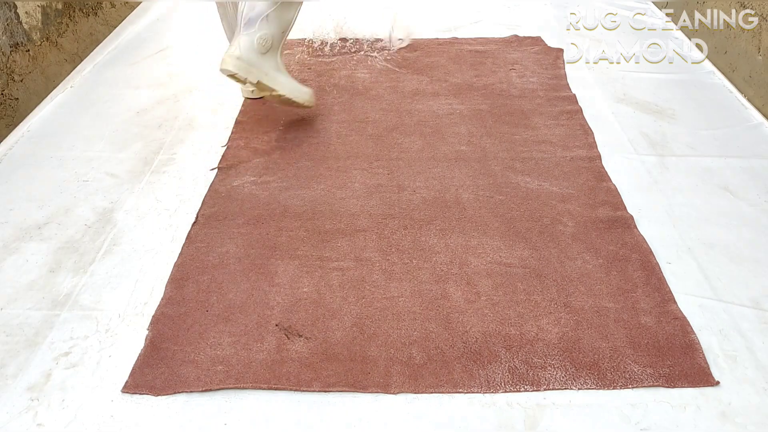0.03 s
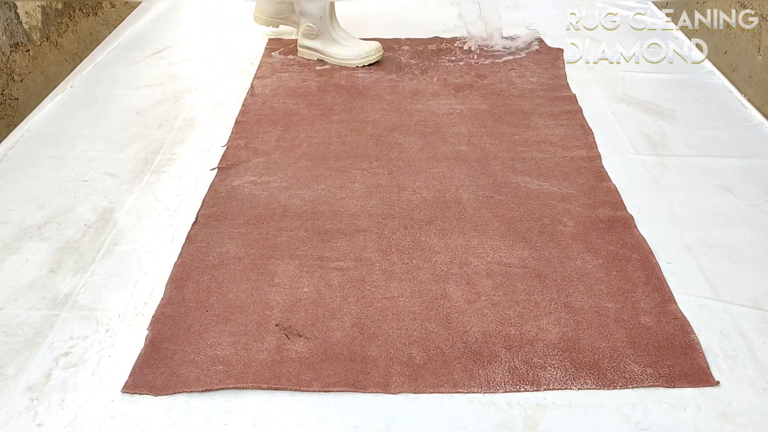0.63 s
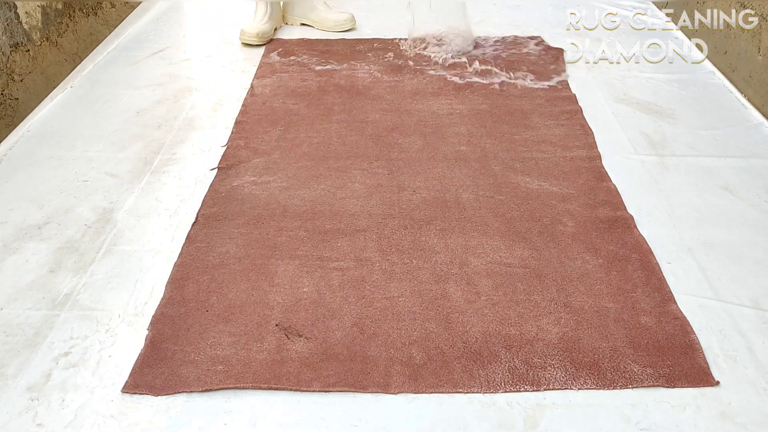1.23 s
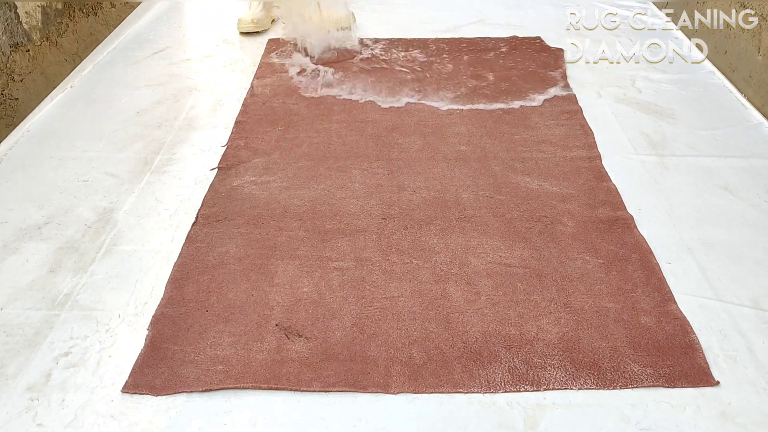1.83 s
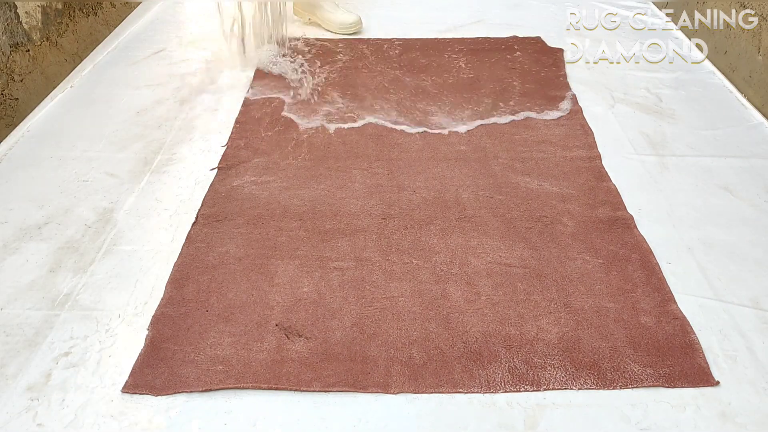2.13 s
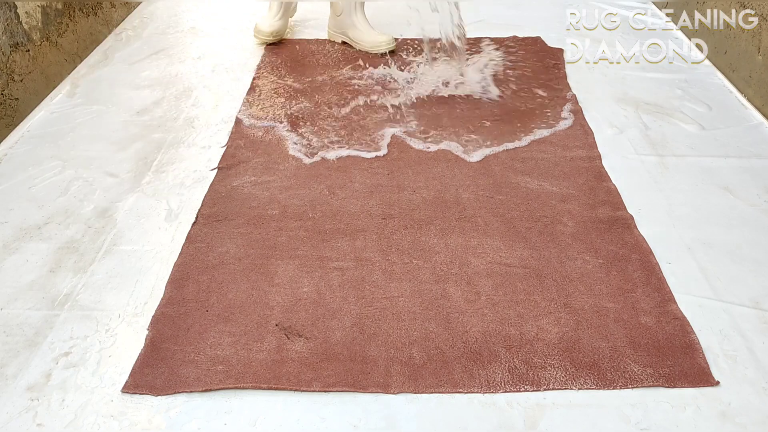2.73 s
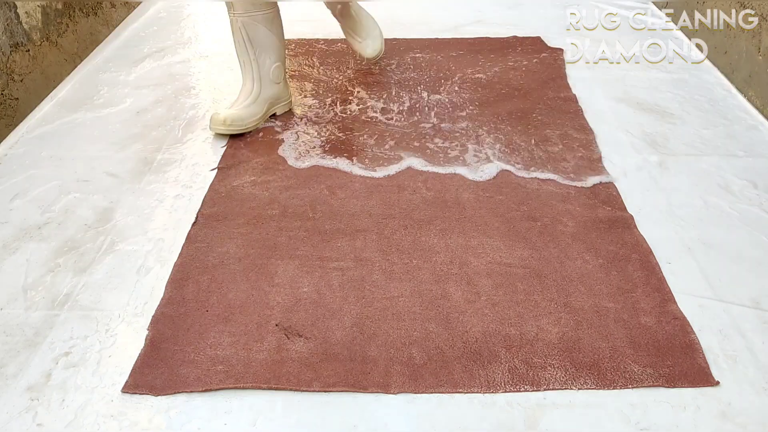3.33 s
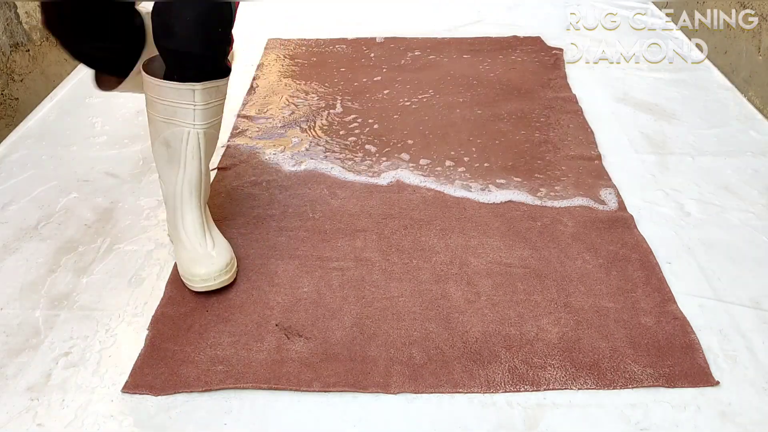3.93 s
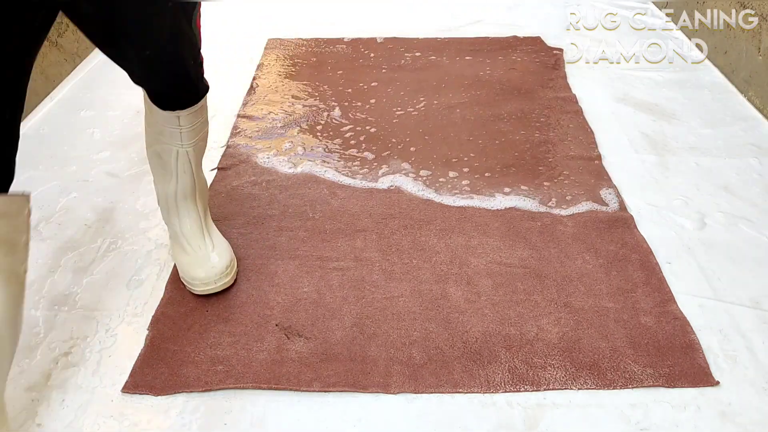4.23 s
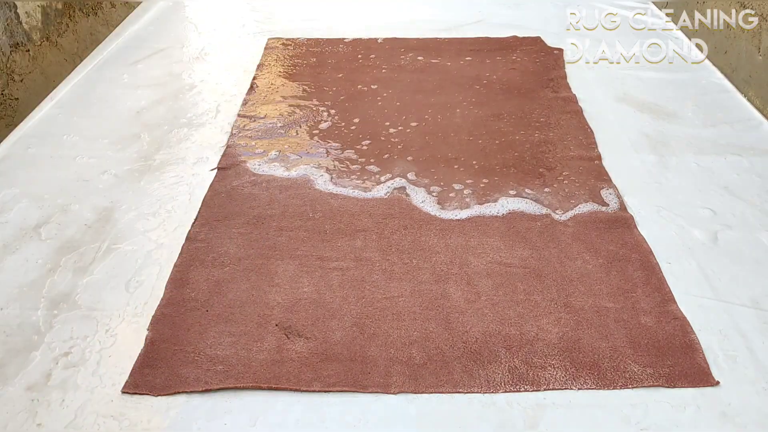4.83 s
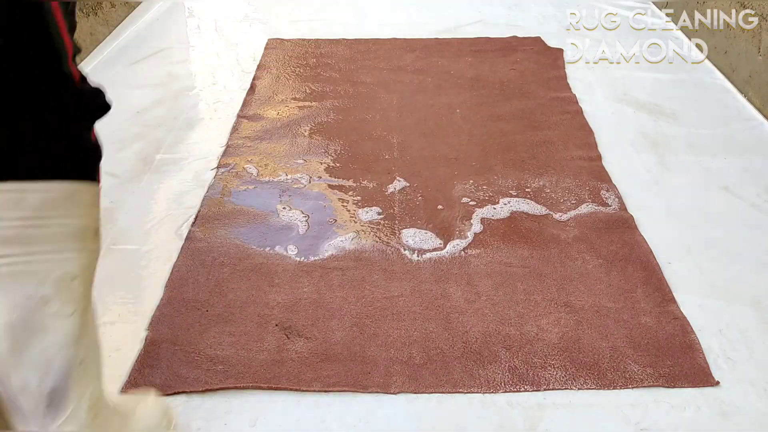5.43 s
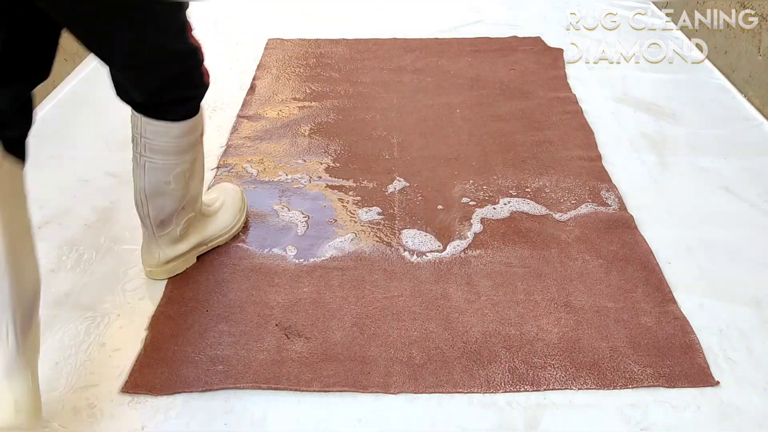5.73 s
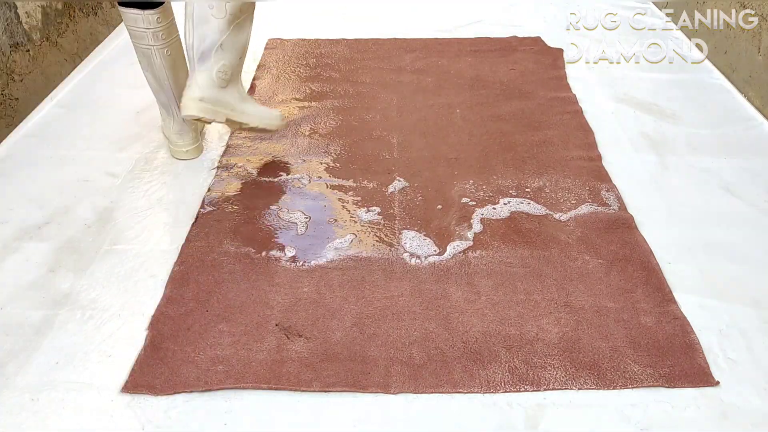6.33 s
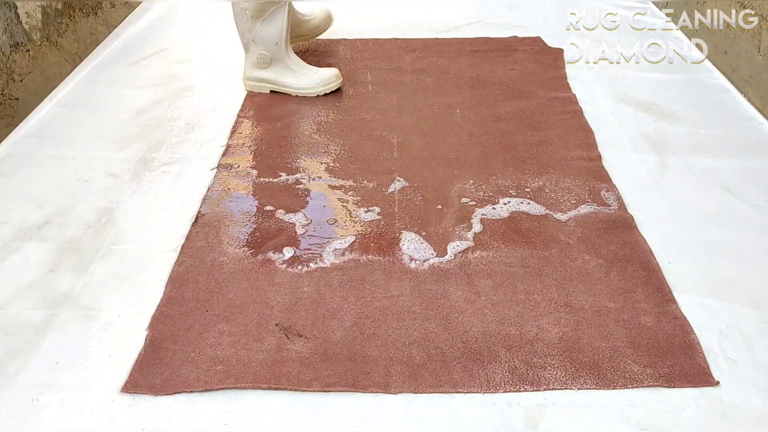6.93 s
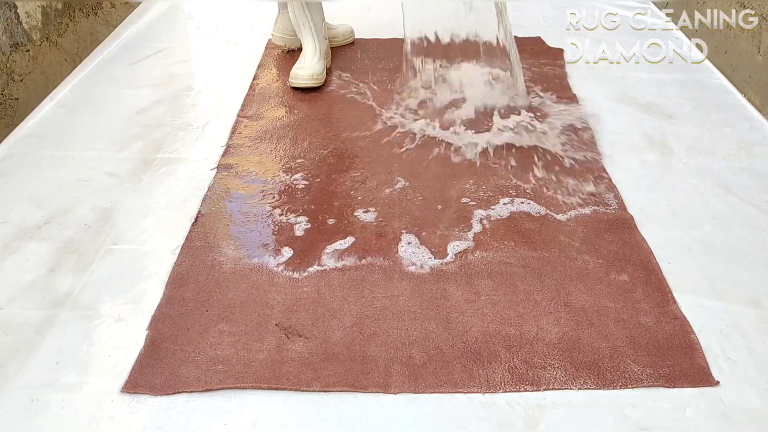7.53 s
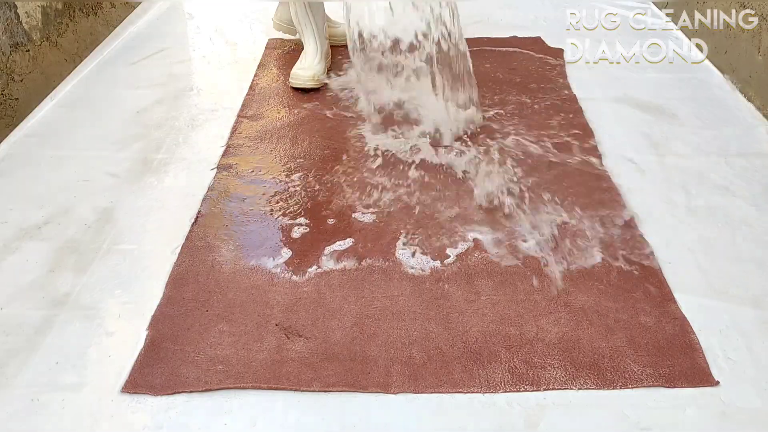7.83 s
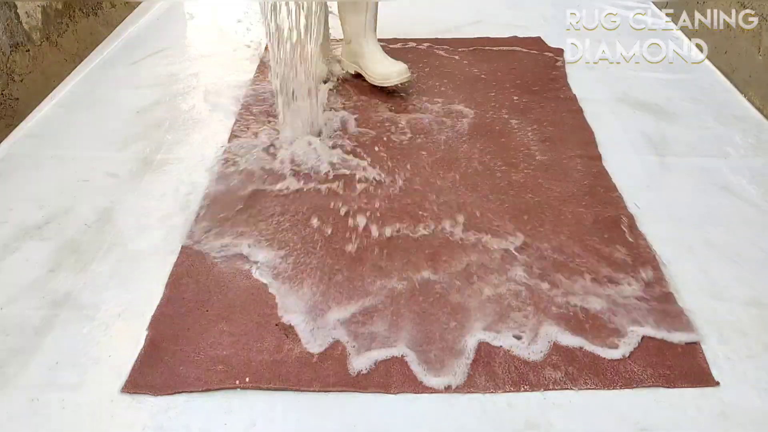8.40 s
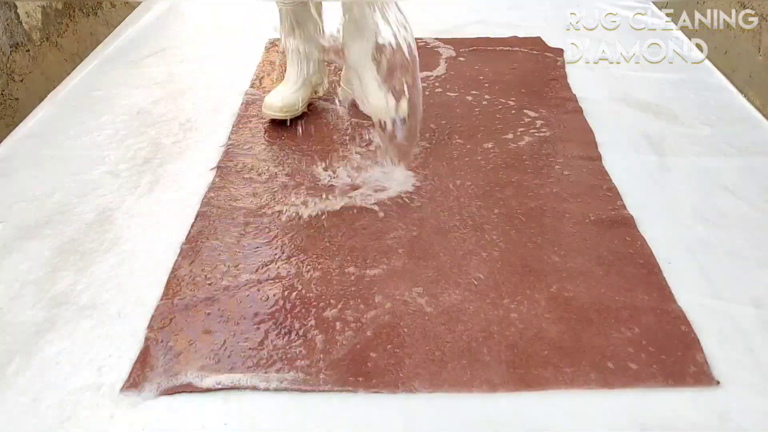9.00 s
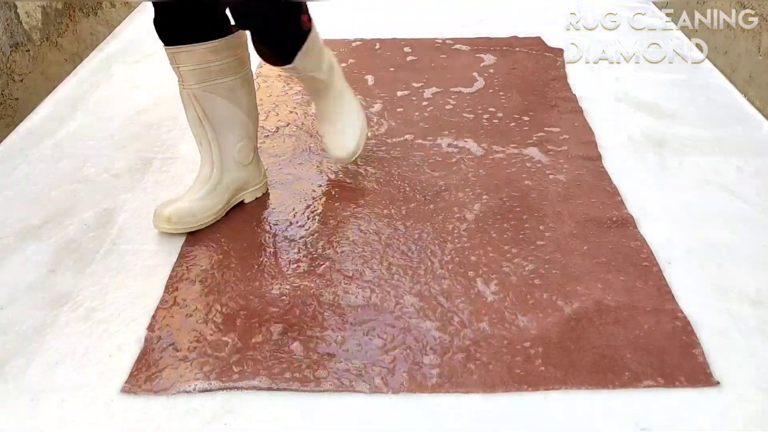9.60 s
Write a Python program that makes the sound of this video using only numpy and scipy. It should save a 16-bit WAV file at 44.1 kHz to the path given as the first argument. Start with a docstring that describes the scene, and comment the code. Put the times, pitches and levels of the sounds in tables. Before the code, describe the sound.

Two loud pours of water splash onto a rug on a hard floor, separated by rubber boots thudding and squelching.

```python
"""A machine hums far from a bare washroom as a bucket of water is sluiced over a rug on the hard floor.
Drops spatter, and the stream plunges into its own puddle, trapping bubbles of air that ring.
After three seconds the pour ends; foam fizzes while rubber boots thud and squelch on the soaked rug.
Near seven seconds a second bucket follows, and a low, wavering note rings in the room under it.
Just after nine seconds the water stops, leaving the foam and a few last steps."""
import sys
import numpy as np
from scipy import signal
from scipy.fft import rfft, irfft, next_fast_len
from scipy.io import wavfile
from scipy.ndimage import uniform_filter1d

SR = 44100
rng = np.random.default_rng(int(sys.argv[2]) if len(sys.argv) > 2 else 0)


def generate_wav(sig):
    """Save sig (samples, or channels by samples) to the path in sys.argv[1] as 16-bit PCM at SR."""
    pcm = np.round(np.clip(np.atleast_2d(sig).T, -1, 1) * 32767).astype(np.int16)
    wavfile.write(sys.argv[1], SR, pcm)


N = 426006
TIME = np.arange(N) / SR


def amp(db):
    """Turns decibels into a number to multiply a sound by."""
    return 10 ** (np.asarray(db) / 20)


def evened(x):
    """Scales a sound to a standard strength (rms 1)."""
    return x / np.sqrt(np.mean(x ** 2) + 1e-20)


def read(points, hz):
    """Looks up a table by pitch, blending between rows on a musical (log) scale."""
    f, value = np.transpose(points)
    return np.interp(np.log(hz + 1), np.log(f + 1), value)


def add(mix, start_s, sound):
    """Mixes a sound in at the given time."""
    part = mix[:, max(round(start_s * SR), 0):][:, :sound.shape[1]]
    part += sound[:, :part.shape[1]]


def tint(x, db_at):
    """Turns each pitch up or down by the decibels that db_at gives for it."""
    size = next_fast_len(x.shape[-1] + 2048, True)
    gain = amp(db_at(np.fft.rfftfreq(size, 1 / SR)))
    return irfft(rfft(x, size) * gain, size)[..., :x.shape[-1]]


def humps(notes, hz):
    """The boost in decibels around a few ringing notes."""
    return sum(db / (1 + (2 * (hz - f) / width) ** 2) for f, width, db in notes)


def drift(size, per_s):
    """A random wobble that heads for a new value per_s times a second."""
    at = np.arange(size) * per_s / SR
    return evened(np.interp(at, np.arange(8192), rng.standard_normal(8192)))


def swell(rise_s, decay_s, size):
    """The loudness of one hit: it builds up, then dies away."""
    return (1 - np.exp(-TIME[:size] / max(rise_s, 1e-4))) * np.exp(-TIME[:size] / max(decay_s, 1e-3))


def diffuse(pair, db_at, spacing_m=0.2):
    """Sound from all sides: left and right agree only on waves longer than the gap between them."""
    size = next_fast_len(pair.shape[1], True)
    hz = np.fft.rfftfreq(size, 1 / SR)
    a, b = rfft(pair, size) * amp(db_at(hz))
    same = np.sinc(2 * hz * spacing_m / 343)  # sound travels 343 m a second
    mid, side = a * np.sqrt((1 + same) / 2), b * np.sqrt((1 - same) / 2)
    return evened(irfft([mid + side, mid - side], size)[:, :pair.shape[1]])


# Notes that build up between the walls: pitch_hz, width_hz, boost_db
ROOM_NOTES = [(183.2, 6.6, 10), (283.4, 8.4, 4.5), (352, 16, 6.5), (404, 22, 5), (414, 17, 3),
              (484, 14, 3.5), (715, 29, 3)]
# How long an echo takes to fade by 60 dB: pitch_hz, fade_s
ECHO_FADE = [(150, 0.59), (400, 0.36), (1000, 0.27), (2800, 0.4), (7300, 0.21), (15000, 0.2)]
def room(x, direct=0.39, size=16384):
    """Sound from one spot arrives straight through the air, then as a blur of echoes off the walls."""
    noise = diffuse(rng.choice([-1., 1.], (2, size)), np.zeros_like)
    hz, t, bands = signal.stft(noise, SR, nperseg=256)
    tail = signal.istft(bands * amp(-60 * t / read(ECHO_FADE, hz)[:, None]), SR)[1]
    path = tail / np.linalg.norm(tail[0])
    path[[0, 1], rng.integers(0, 16, 2)] += direct
    for f, width, db in ROOM_NOTES:
        path = path + (amp(db) - 1) * signal.lfilter(*signal.iirpeak(f, f / width, SR), path)
    return signal.oaconvolve(np.atleast_2d(x), path / np.hypot(1, direct), axes=1)[:, :N]


# The tone of the quiet room: pitch_hz, level_db
RUMBLE_TONE = [(20, 0.5), (35, -7), (60, -10.5), (100, 1), (140, -17.5), (190, -5.5), (260, -11),
               (420, -12), (650, -16), (1200, -22.5), (3000, -26.5), (7000, -28), (15000, -26.5)]
# The tone of moving air: pitch_hz, level_db
DRAUGHT_TONE = [(15, -17), (35, -5), (55, 9), (200, -18), (2000, -70)]
def still_room(hum_hz=48.6, waver=0.54):
    """A low rumble, a faint draught and the wavering hum of a distant machine."""
    noise = rng.standard_normal((2, N))
    rumble = diffuse(noise, lambda hz: read(RUMBLE_TONE, hz) + humps(ROOM_NOTES, hz) / 2)
    draught = evened(tint(rng.standard_normal((2, N)), lambda hz: read(DRAUGHT_TONE, hz)))
    note = np.sin(2 * np.pi * hum_hz * TIME + waver * drift(N, per_s=22))
    hum = evened(note * (1 + waver * drift(N, per_s=6.8)))
    return amp(-50) * rumble + amp(-59) * draught + amp(-53) * hum


def impacts(shape, per_s, spread_db):
    """Drops land at random, one click each; spread_db sets how much their sizes differ."""
    clicks = np.zeros(shape)
    where, sign, chance = rng.random((int(clicks.size * per_s / SR), 3)).T
    size_db = spread_db * np.minimum(-np.log(1 - chance), 4)
    clicks.flat[(where * clicks.size).astype(int)] = np.sign(sign - .5) * amp(size_db)
    return clicks


def drops(size, tone, per_s=7000, spread_db=6.5):
    """Drops of one kind land close by."""
    return evened(tint(impacts(size, per_s, spread_db), lambda hz: read(tone, hz)))


def shower(tone, per_s, spread_db):
    """Drops of one kind land all around, heard mostly by way of the walls."""
    return diffuse(impacts((2, N), per_s, spread_db), lambda hz: read(tone, hz))


def splats(per_s=40, decay_s=.005, depth=.35):
    """The spray gets louder for an instant each time a fold of the stream hits the floor."""
    hits = abs(impacts(N, per_s, spread_db=0))
    leaps = signal.oaconvolve(hits, np.exp(-TIME[:4096] / decay_s))[:N]
    return evened(1 + depth * leaps)


def patchy(x, depth_db):
    """The spatter's tone flickers at random from moment to moment."""
    bands = signal.stft(x, nperseg=512, noverlap=256)[2]
    patches = uniform_filter1d(rng.standard_normal(bands.shape[1:]), size=3, axis=0)  # blur in pitch
    patches = uniform_filter1d(patches, size=7, axis=1)  # blur in time
    return evened(signal.istft(bands * amp(depth_db * evened(patches)))[1][:, :N])


def bubbles(low_hz, high_hz, per_s, cycles, glide=0.081, count=24):
    """Trapped air rings briefly, rising in pitch as it nears the surface."""
    out = np.zeros(N)
    for hz in np.geomspace(low_hz, high_hz, count):
        age = np.arange(0, 4, hz / cycles / SR)  # counted in decay times
        births = rng.integers(0, N - len(age), int(per_s * N / SR / count))
        detune, size = rng.standard_normal((len(births), 2)).T[:, :, None]
        ring = np.exp(-age) * np.sin(2 * np.pi * cycles * age * (1 + 0.031 * detune + glide * age / 2))
        places = births[:, None] + np.arange(len(age))
        out += np.bincount(places.ravel(), (size * ring).ravel() * np.sqrt(hz), N)
    return evened(out)


def cavity(stir, hz, width_hz):
    """A pocket of air in water rings when stirred, at a pitch that may move."""
    turn = np.exp(2j * np.pi * np.cumsum(hz * np.ones(stir.shape[-1])) / SR)
    hold = np.exp(-np.pi * width_hz / SR)
    # shift the pitch down to zero, smooth twice, then shift it back
    smoothed = signal.lfilter([1], [1, -2 * hold, hold * hold], stir * turn.conj())
    return evened((turn * smoothed).real)


# The tone of tiny drops: pitch_hz, level_db
FINE_TONE = [(500, -53), (3000, -24), (6000, -9), (8000, -0.5), (11000, 4), (13000, -0.5), (15500, -18.5)]
# The tone of mid-sized drops: pitch_hz, level_db
SPATTER_TONE = [(900, -20), (2000, -17), (3000, -1), (5500, -0.5), (7500, -1.5), (11000, -5.5)]
# The tone of large flung drops: pitch_hz, level_db
SQUIRT_TONE = [(300, -9.5), (1500, -2.5), (3000, -0.5), (4200, 4), (6500, 0.5), (8000, 1), (11000, -0.5)]
# The tone of coarse splashing: pitch_hz, level_db
SPLASH_TONE = [(300, -46), (700, -11), (1100, 1), (2200, 7.5), (3000, 8), (6000, -45)]
# The tone of the plunge, whose cavity is too small for bass: pitch_hz, level_db
PLUNGE_TONE = [(100, -21), (215, -18), (275, -2), (400, -5.5), (1000, 7.5)]
# The tone of water drumming on the floor: pitch_hz, level_db
DRUM_TONE = [(90, -6), (150, -8), (179, 11.5), (230, -3), (330, -16), (1500, -68)]
# One list a bucket, with plunge and splash relative to the flow:
# time_s, flow_db, plunge_db, splash_db, plunge_pitch_hz
BUCKETS = [
    [(0, -24, -19.5, -16, 437), (.1, -24, -17.5, -19, 470), (.22, -22.5, -17, -19.5, 524),
     (.29, -23, -18, -19, 586), (.37, -25.5, -24, -14, 640), (.43, -28, -27, -14.5, 700),
     (.46, -25, -26.5, -16.5, 610), (.6, -28, -17.5, -21, 475), (.65, -25.5, -18, -15.5, 470),
     (.72, -26.5, -22.5, -15, 540), (.85, -26.5, -17, -16.5, 590), (1.14, -24, -22, -16.5, 500),
     (1.36, -27.5, -17, -13.5, 450), (1.43, -26.5, -16, -13, 440), (1.66, -30, -18, -15, 503),
     (1.72, -26.5, -21, -15.5, 540), (2.0, -27, -18.5, -13.5, 560), (2.14, -27.5, -24.5, -16.5, 590),
     (2.32, -25, -46, -18, 620), (2.38, -23, -25, -18, 570), (2.61, -29.5, -23, -15, 580),
     (2.78, -28, -35, -13.5, 730), (2.86, -26, -52, -17, 520), (2.98, -31, -35, -16, 560),
     (3.02, -28, -23, -22, 590), (3.12, -37, -19, -29, 407), (3.27, -49, -9, -31, 423)],
    [(6.83, -36, -7.5, -23, 600), (6.89, -20, -27.5, -10.5, 650), (6.95, -20.5, -19.5, -15.5, 535),
     (7.0, -25.5, -18.5, -16, 480), (7.12, -24.5, -14, -17.5, 393), (7.22, -23, -13.5, -13.5, 340),
     (7.34, -26.5, -12.5, -17.5, 350), (7.57, -25, -18, -16.5, 340), (7.72, -24, -15, -12.5, 356),
     (7.92, -25, -16.5, -16, 428), (8.05, -25, -19, -11, 580), (8.22, -24.5, -19, -18.5, 430),
     (8.45, -25, -19.5, -15, 587), (8.58, -29, -36, -14.5, 405), (8.64, -25.5, -43, -21, 420),
     (8.72, -28, -42, -25, 440), (8.765, -31, -36, -26, 451), (8.83, -26, -41, -11, 590),
     (8.95, -24, -23, -20, 656), (9.02, -25.5, -26, -15, 734), (9.07, -38, -19, -10.5, 560),
     (9.14, -40.5, -16, -15, 380), (9.24, -52, 4, -5, 400)],
]
def pour(surge_db=.5, spatter_follow=0.21, drum_fade_db_per_s=11.5):
    """The stream breaks into drops, traps bubbles, churns its puddle and drums on the floor."""
    rows = np.vstack(BUCKETS)
    flow_db, plunge_db, splash_db, hz = (np.interp(TIME, rows[:, 0], column) for column in rows.T[1:])
    running = sum((TIME >= bucket[0][0]) & (TIME <= bucket[-1][0]) for bucket in BUCKETS)
    flow = uniform_filter1d(running * 1., size=1200) * amp(flow_db + surge_db * drift(N, per_s=22))
    lumps_db = drift(N, per_s=60)  # heavy lumps of water stir the low sounds most
    bursts = splats()

    spray = bursts * patchy(shower(FINE_TONE, per_s=12000, spread_db=-0.5), depth_db=1)
    spatter = patchy(shower(SPATTER_TONE, per_s=3500, spread_db=2), depth_db=2.4)
    spatter *= amp(lumps_db / 2 - 3) * bursts
    near_drops = amp(-11.5) * room(drops(N, SQUIRT_TONE, per_s=240, spread_db=1.8), direct=0.6)
    spatter = (spatter + near_drops) * amp(spatter_follow * (splash_db - np.median(rows[:, 3])))
    splash = patchy(shower(SPLASH_TONE, per_s=4000, spread_db=0.5), depth_db=2.5)
    splash *= amp(splash_db + lumps_db + 3)

    froth = room(bubbles(low_hz=899.5, high_hz=5005, per_s=600, cycles=9), direct=0.66)
    froth *= amp(splash_db + 2)
    gulps = room(bubbles(low_hz=700, high_hz=3200, per_s=150, cycles=9), direct=0.7)
    gulps *= amp((splash_db + plunge_db) / 2 - 4.5)  # big bubbles need both splash and plunge
    stir = diffuse(rng.standard_normal((2, N)), lambda f: read(PLUNGE_TONE, f) + humps(ROOM_NOTES, f))
    churn = amp(plunge_db + lumps_db + 3) * cavity(stir, hz, width_hz=0.78 * hz.mean())

    first_s, second_s = (bucket[0][0] for bucket in BUCKETS)
    poured_s = TIME - np.where(TIME < second_s, first_s, second_s)
    cushion_db = drum_fade_db_per_s * poured_s  # the growing puddle softens the drumming
    drum = amp(plunge_db + lumps_db - cushion_db - 3) * shower(DRUM_TONE, per_s=3000, spread_db=-0.5)
    return flow * (spray + spatter + splash + froth + gulps + churn + drum)


# The tone of a padded knock: pitch_multiple, level_db
KNOCK_TONE = [(.3, -27), (.6, -7.5), (.95, -3.5), (1.3, -4.5), (1.9, -9), (4, -26.5), (12, -27)]
def knock_tone(hz):
    """Moves the tone of a knock on the rug to this pitch."""
    return [(hz * multiple, db) for multiple, db in KNOCK_TONE]


def blow(parts, shape):
    """A dull hit whose parts (level_db, tone) swell and fade together."""
    sound = sum(amp(db) * evened(shape * drops(len(shape), tone)) for db, tone in parts)
    return sound[None] * np.sqrt(np.mean(shape ** 2))


def pocket(hz, width_share, size):
    """Squeezed air rings; a small pocket gives off little below its own pitch."""
    ring = cavity(impacts(size, per_s=1500, spread_db=3), hz, width_share * hz)
    return evened(tint(ring, lambda f: read([(hz / 3, -10), (hz / 2, 0)], f)))


def ringing(hz, shape, width_share):
    """A rough ring around one pitch that swells and fades with a hit."""
    size = len(shape)
    ring = pocket(hz, width_share, 2 * size)[size:]
    return evened(shape * ring)[None] * np.sqrt(np.mean(shape ** 2))


# Heavy lumps of water landing in the puddle: start_s, level_db, decay_s, pitch_hz
DOLLOPS = [(0.03, -33.5, 0.042, 490), (0.169, -29, 0.041, 486), (0.605, -28, 0.018, 483),
           (0.655, -30.5, 0.02, 473), (0.956, -32.5, 0.021, 480), (1.02, -29, 0.032, 497),
           (1.2, -30, 0.019, 480), (1.243, -28, 0.013, 488), (2.0, -31.5, 0.017, 480),
           (2.39, -34, .016, 503), (7.24, -18, 0.013, 386), (7.244, -25, .02, 697), (7.69, -33, 0.02, 290),
           (7.759, -31, 0.02, 473), (7.945, -25, 0.014, 361), (7.975, -28, 0.031, 530),
           (8.418, -23, 0.011, 695), (8.94, -29.5, 0.015, 670)]
def dollops(rise_s=0.011, knock_hz=535, size=16384):
    """A lump of water knocks on the rug with a short, dull ring."""
    spot = np.zeros((1, N))
    for start_s, db, decay_s, hz in DOLLOPS:
        shape = swell(rise_s, decay_s, size)
        add(spot, start_s, blow([(db - 3, knock_tone(knock_hz)), (db - 21, DRUM_TONE)], shape))
        add(spot, start_s, amp(db - 4) * ringing(hz, shape, width_share=.14))
    return room(spot[0], direct=1.74)


# Which side the slaps come from: time_s, left_minus_right_db
SLAP_SIDES = [(4, -3), (4.5, -5), (5.2, -2), (5.45, -1), (6.65, -0.5), (6.75, -3), (6.81, 0.5), (9.1, -1),
              (9.28, -4), (9.34, 2)]
# Wet slaps, with large drops relative to the level: start_s, level_db, large_drops_db, rise_s, decay_s
WET_SLAPS = [(0.637, -17.5, -14, .002, 0.017), (0.67, -19, -4, 0.0022, 0.0081),
             (0.782, -15, -13, .001, .008), (1.435, -16.5, -13, .001, 0.0098),
             (1.849, -20, -9, 0.0011, .007), (1.958, -20.5, -2.5, .002, 0.01),
             (2.169, -16, -10, .001, 0.012), (2.23, -26, -18, .001, 0.011), (2.29, -19, -11, .001, .007),
             (2.92, -14.5, -20, 0.0011, 0.0097), (3.015, -31, -18, .001, .008),
             (3.166, -26, -17, 0.006, .02), (3.19, -22.5, -10, 0.0035, 0.012),
             (3.455, -29, -9, 0.0079, 0.022), (3.59, -48, 2.5, .004, .02),
             (4.001, -38.5, -14.5, .002, 0.081), (4.142, -35.5, -13, .007, 0.05),
             (4.538, -16.5, -11.5, 0.00072, 0.0047), (4.56, -35.5, -3.5, 0.0032, .012),
             (4.955, -40, 2, .0004, .004), (4.989, -29, -6, .0004, 0.0018),
             (4.962, -36.5, -6.5, 0.012, 0.061), (5.008, -23.5, -14, 0.00037, 0.0035),
             (5.122, -46, 8, 0.0004, 0.0036), (5.149, -34.5, 2, .0004, 0.003),
             (5.168, -24.5, -1.5, 0.014, 0.019), (5.392, -37, -6.5, 0.017, 0.049),
             (5.501, -16.5, -9.5, 0.0018, .012), (5.522, -28, -6, .001, 0.021),
             (5.557, -29, -9, .0004, .002), (5.569, -27, -14, .0004, 0.0026),
             (5.709, -33, -18, 0.00044, 0.0022), (5.85, -31.5, -18, .0004, 0.0036),
             (5.872, -26.5, -14.5, 0.0037, 0.028), (5.963, -51, 7.5, 0.0038, 0.033),
             (6.016, -27, -7, 0.0058, 0.011), (6.269, -24.5, -12.5, 0.0044, 0.051),
             (6.27, -23, -14, .0006, .004), (6.343, -25, -10.5, .006, 0.013),
             (6.422, -44.5, 5.5, 0.0022, 0.014), (6.449, -31, -13, .0005, .004),
             (6.48, -41.5, -1, 0.0047, 0.021), (6.645, -35, -8, 0.00055, 0.0035),
             (6.742, -28.5, -8, 0.0023, 0.034), (6.747, -17, -20, 0.00063, 0.0017),
             (6.809, -13.5, -14, 0.00055, 0.018), (6.858, -12, -16, .002, 0.0064),
             (7.037, -12, -16, .004, .018), (7.24, -10, -7, 0.0043, 0.019),
             (7.67, -16, -4.5, 0.0011, 0.0092), (7.95, -18.5, -1.5, .0012, .016),
             (8.345, -15, -4, 0.0028, .013), (8.458, -17, -9, .001, 0.0067), (8.633, -28, -7, .001, .007),
             (8.815, -24, -7, .001, .008), (9.088, -24, -12, .002, .014), (9.186, -39, 2.5, .002, 0.023),
             (9.285, -17.5, -8, 0.00088, 0.0049), (9.311, -40, 3.5, .001, .0055),
             (9.3395, -17, -18, 0.00057, 0.0047), (9.423, -29, -8, .002, .006),
             (9.607, -45.5, 10, 0.016, 0.031)]
def slaps(pocket_hz=1380, db_per_octave=26, pocket_growth=2.13, ragged_db=1.2, size=8192, count=3):
    """Water lands in a sheet or squirts from under a sole: a burst of drops round an air pocket."""
    spots = np.zeros((count, 2, N))  # places on the floor, each with its own echoes
    for k, (start_s, db, large_db, rise_s, decay_s) in enumerate(WET_SLAPS):
        spray = amp(-1.5) * drops(size, FINE_TONE, per_s=9000, spread_db=3)
        squirt = amp(large_db + 2) * drops(size, SQUIRT_TONE, per_s=3000, spread_db=3.2)
        ticks = amp(large_db - 1) * drops(size, SQUIRT_TONE, per_s=320, spread_db=1.5)
        hz = pocket_hz * 2 ** (-large_db / db_per_octave)  # more large drops trap a bigger, lower pocket
        air = amp(pocket_growth * large_db - 7) * pocket(hz, width_share=1.2, size=size)
        side_db = np.interp(start_s, *np.transpose(SLAP_SIDES)) / 2
        shape = amp(db + ragged_db * drift(size, per_s=570)) * swell(rise_s, decay_s, size)
        burst = shape * (spray + squirt + ticks + air)
        add(spots[k % count], start_s, amp([[side_db], [-side_db]]) * burst)
    return sum(room(spot, direct=0.95) for spot in spots)


# Large air pockets bursting: start_s, level_db, pitch_hz, decay_s
AIR_POPS = [(0.672, -23, 3330, 0.0096), (0.79, -30.5, 2170, 0.019), (2.914, -31, 2460, .006),
            (5.516, -22.5, 2450, 0.0054), (5.529, -40, 2200, 0.031), (6.422, -45, 2140, .008),
            (8.66, -27, 2620, 0.018), (8.875, -28, 2600, 0.013), (8.998, -29, 2100, .014)]
def squelches(rise_s=0.0021, echo_db=-9, size=8192):
    """Air escapes from under a sole or a sheet of water with a short, hard ring."""
    spot = np.zeros((1, N))
    for start_s, db, hz, decay_s in AIR_POPS:
        add(spot, start_s, amp(db) * ringing(hz, swell(rise_s, decay_s, size), width_share=0.22))
    return spot + amp(echo_db) * room(spot[0], direct=0)


# Foam and run-off on the rug, heard once the pouring stops: time_s, level_db
FOAM_LEVELS = [(3.0, -40), (3.6, -44), (4.3, -49), (5.05, -48.5), (6.25, -61), (6.45, -58), (6.8, -53),
               (9.1, -40.5), (9.66, -42.5)]
def foam():
    """Tiny bubbles burst as the sheet of water creeps on and soaks in."""
    fizz = amp(-4) * shower(FINE_TONE, per_s=8100, spread_db=0)
    trickle = amp(-20) * room(bubbles(low_hz=1203, high_hz=7040, per_s=450, cycles=7))
    return amp(np.interp(TIME, *np.transpose(FOAM_LEVELS))) * (fizz + trickle)


# The tone of the floor giving under a boot: pitch_hz, level_db
BUMP_TONE = [(20, -5), (55, 3), (100, 0), (200, -31), (1500, -70)]
# Notes the room booms on after a step, and their time to fade by 60 dB: pitch_hz, level_db, fade_s
BOOM_NOTES = [(179.1, 1.5, 0.5), (347.7, -2.5, 0.41), (420, -4, 0.33)]
# Boots landing: start_s, knock_db, thump_db, thump_pitch_hz, boom_db, bump_db, decay_s
STEPS = [(3.101, -36, -37, 415, -56, -60, 0.0083), (3.18, -51, -37, 733, -58, -60, .014),
         (3.701, -35.5, -37, 400, -50, -55, 0.016), (4.009, -49, -44, 260, -52, -60, .008),
         (4.162, -40, -47, 330, -57, -60, .008), (4.532, -26, -27.5, 244, -38, -42, 0.014),
         (4.592, -47, -40, 251, -46, -48, .02), (4.956, -35.5, -27.5, 212, -44, -43, 0.014),
         (5.063, -37, -30, 235, -44, -55, .014), (5.135, -31.5, -30, 346, -52, -44, 0.041),
         (5.497, -42, -37, 260, -48, -48, 0.015), (5.567, -42, -40, 258, -49, -50, .014),
         (5.875, -45.5, -45, 250, -50, -48, .03), (5.963, -28.5, -28.5, 520, -38.5, -35, .021),
         (6.346, -44, -39, 260, -45, -44, .021), (9.199, -36, -32, 340, -51, -56, 0.016),
         (9.338, -34.5, -34, 369, -48, -50, 0.01), (9.609, -28.5, -32, 430, -48, -20.5, 0.035)]
def boots(knock_hz=348, rise_share=0.46, boom_rise_s=0.013, size=16384, count=2):
    """The rug pads each boot to a dull knock and a short thump; the floor gives, and the room booms."""
    spots, near, t = np.zeros((count, 1, N)), np.zeros((1, N)), TIME[:size]
    for k, (start_s, knock_db, thump_db, hz, boom_db, bump_db, decay_s) in enumerate(STEPS):
        shape = swell(rise_share * decay_s, decay_s, size)
        landing = blow([(knock_db - 1, knock_tone(knock_hz)), (bump_db, BUMP_TONE)], shape)
        add(spots[k % count], start_s, landing)
        notes = sum(amp(db - 60 * t / fade_s) * np.sin(2 * np.pi * (f * t + rng.random()))
                    for f, db, fade_s in BOOM_NOTES)
        boom = amp(boom_db) * (1 - np.exp(-t / boom_rise_s)) * notes
        thump = amp(thump_db) * shape * np.sin(2 * np.pi * hz * t + .5 * drift(size, per_s=147))
        add(near, start_s, (thump + boom)[None])
    return near + sum(room(spot[0], direct=1.1) for spot in spots)


# The low note under the second pour: time_s, level_db, pitch_hz
LOW_NOTE = [(7.22, -49, 291), (7.26, -28, 288), (7.35, -33.5, 281.6), (7.42, -41, 280.7), (7.52, -49, 280),
            (7.58, -38, 284), (7.68, -39.5, 288.4), (7.74, -48, 306.7), (7.78, -43.5, 359.5),
            (7.88, -40, 391), (7.95, -52, 400)]
def low_note(waver=.7):
    """A low, wavering note rings in the room under the second pour, rising near its end."""
    times, db, hz = np.transpose(LOW_NOTE)
    phase = 2 * np.pi * np.cumsum(np.interp(TIME, times, hz)) / SR + waver * drift(N, per_s=38)
    ring = evened((1 + waver * drift(N, per_s=55)) * np.sin(phase))
    sounding = (TIME > times[0]) & (TIME < times[-1])
    return amp(np.interp(TIME, times, db) - 1) * sounding * ring


def scene():
    """The room, the water and the boots, added together."""
    return still_room() + pour() + dollops() + slaps() + squelches() + foam() + boots() + low_note()


# The ring of each microphone opening, left then right: pitch_hz, width_hz, boost_db
MIC_RINGS = [(11020, 1870, 4), (8640, 2150, 10.5)]
# The duller tone of the right opening: pitch_hz, level_db
RIGHT_TONE = [(7000, -1), (10000, -4.5), (11300, -11.5), (15000, -5)]
def record(dry, top_hz=15600):
    """Each microphone opening adds its own high ring; then the very highest pitches are cut."""
    left = tint(dry[0], lambda hz: humps(MIC_RINGS[:1], hz))
    right = tint(dry[1], lambda hz: humps(MIC_RINGS[1:], hz) + read(RIGHT_TONE, hz))
    high_cut = signal.firwin(511, top_hz, window=("kaiser", 9), fs=SR)
    return signal.oaconvolve(np.array([left, right]), high_cut[None], "same", axes=1)


dry = scene()
out = record(dry)
generate_wav(out)
```